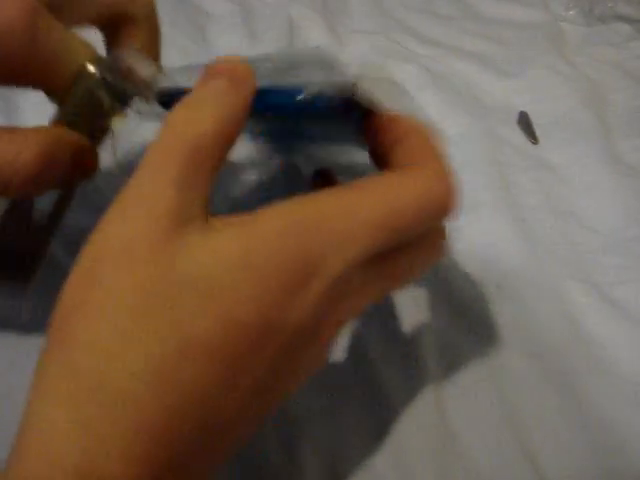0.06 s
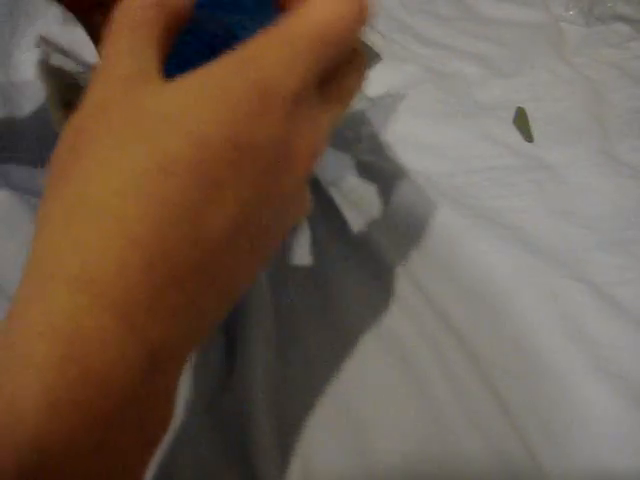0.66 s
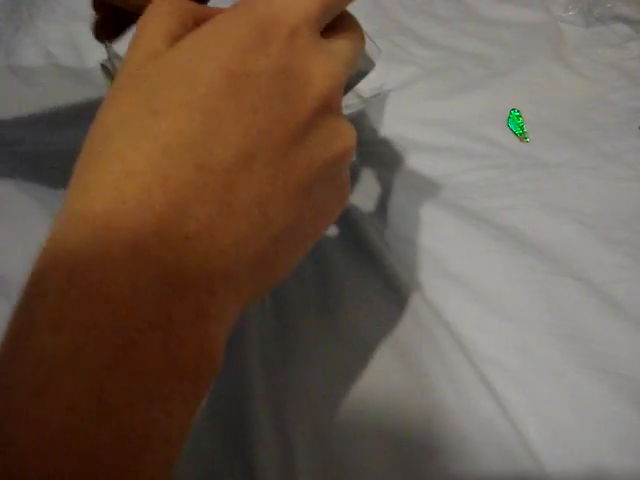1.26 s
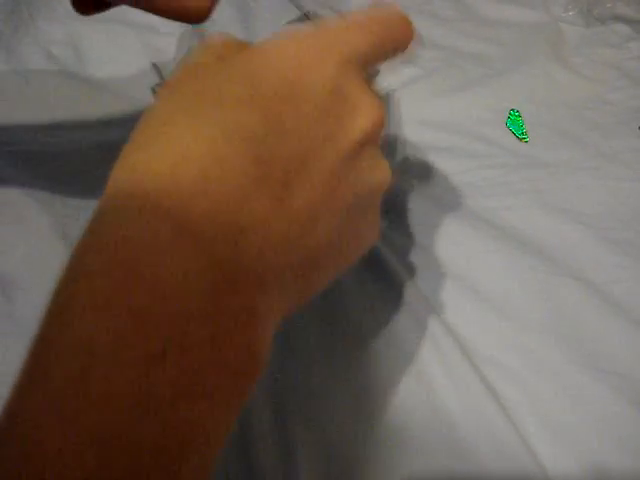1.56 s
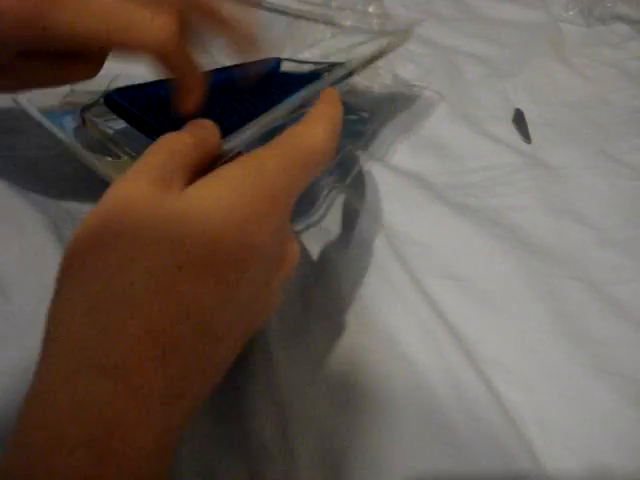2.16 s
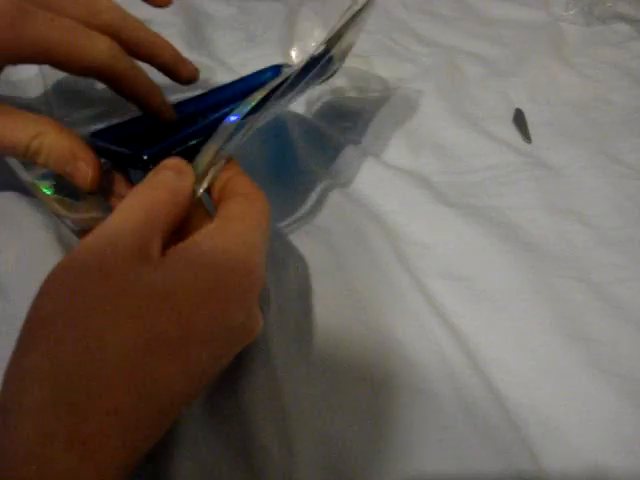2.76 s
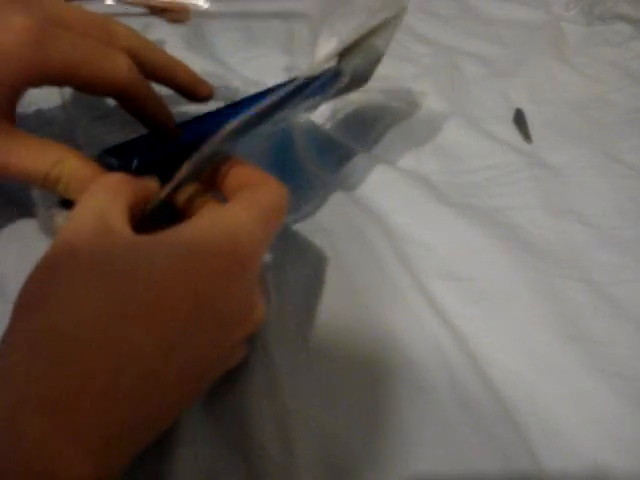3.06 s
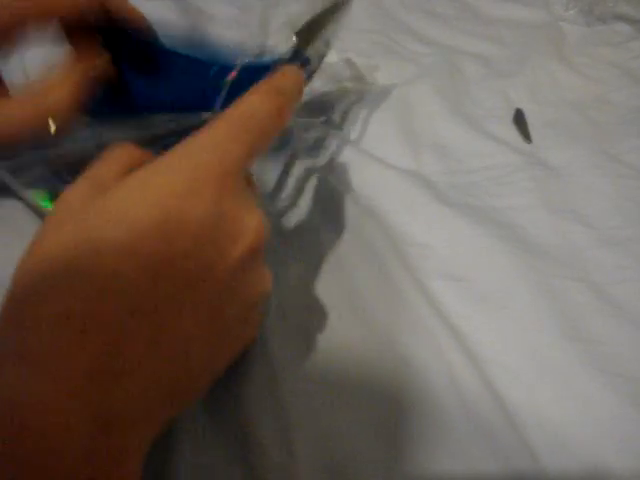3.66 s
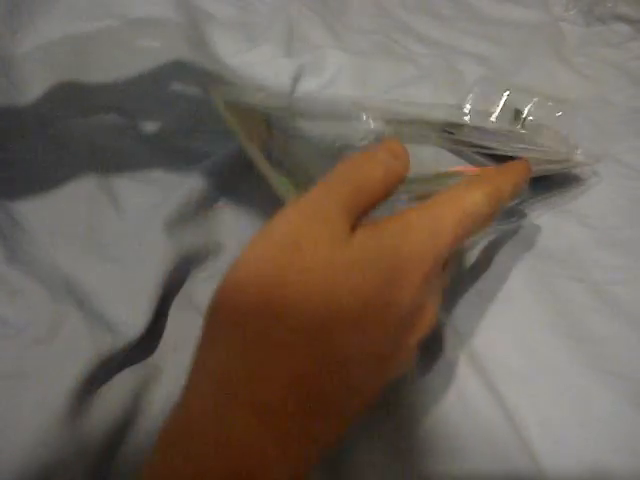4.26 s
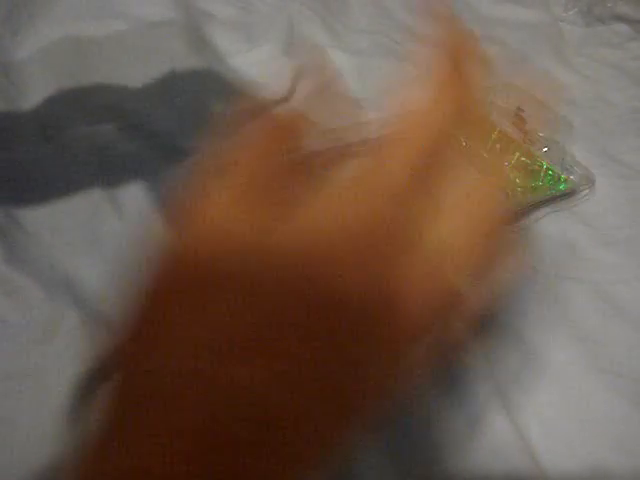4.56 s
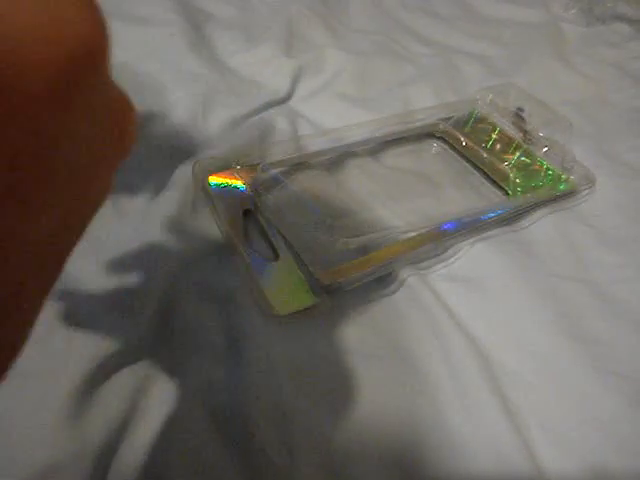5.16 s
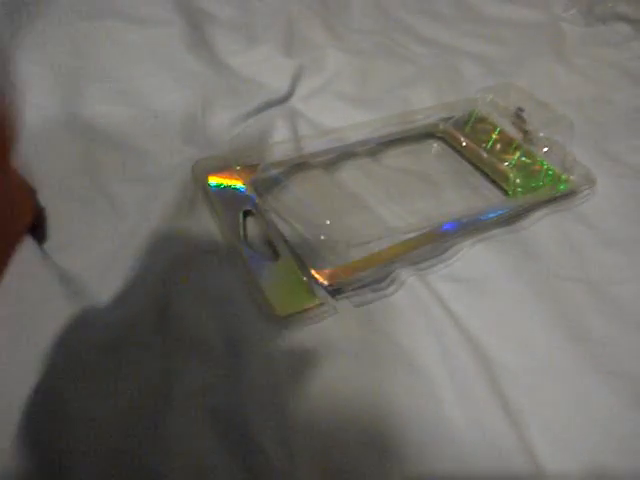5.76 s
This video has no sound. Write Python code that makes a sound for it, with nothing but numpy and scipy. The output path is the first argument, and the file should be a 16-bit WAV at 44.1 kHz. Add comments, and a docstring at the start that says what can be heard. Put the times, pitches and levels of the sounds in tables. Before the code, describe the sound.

Hands open a stiff plastic blister pack on a bed, close to a small microphone in a small room. Faint hiss and a low rustle of bedclothes run throughout. In the first second, fingers scrape the plastic, with light clicks and soft bumps. A sharp snap comes at 1.1 seconds, and the inner tray slides briefly until 1.5. Loud crunches and snaps follow at about 1.5 and 1.75 seconds, each with a short, hollow plastic ring. Smaller clicks and rubbing continue, with a sharper crack near 2.65 seconds and another snap near 3.35. The last big burst of crackling comes from 3.8 to 4 seconds, ending with a dull knock. The hiss dips briefly after the loudest snaps. A few lighter snaps follow until about 4.6 seconds, then the rubbing fades, and one soft bump comes near 5.7 seconds.

```python
"""Two hands open a stiff plastic blister pack on a bed, close to a small camera in a small room.
From the start, bedclothes rustle and fingers rub over a faint hiss. The shell buckles in snaps, each a
run of tiny slips that rings the sheet and its hollow, and the pack bumps softly. Just after 1 s, walls
start to give way in crunches and the inner tray slides out. The camera turns itself down after loud
snaps, so the hiss dips. A last big burst comes near 4 s, then a few lighter snaps and one soft bump."""
import sys
import numpy as np
from scipy import signal
from scipy.io import wavfile
from scipy.ndimage import uniform_filter1d

SR = 44100
rng = np.random.default_rng(int(sys.argv[2]) if len(sys.argv) > 2 else 0)


def put_to_file(sound):
    """Save the sound as 16-bit audio at rate SR, in the file named by the first command-line argument."""
    columns = np.atleast_2d(sound).T  # one column per channel
    safe = np.clip(columns, -1, 1)
    whole_steps = np.round(safe * 32767)
    wavfile.write(sys.argv[1], SR, whole_steps.astype(np.int16))


N = 256835

# tone of the background rumble and hiss: (f/Hz, level/dB)
HISS_TONE = [(15, -7), (25, -10.5), (70, -34.5), (271, -14), (482, -12), (560, -11), (972, -13),
             (1070, -15.5), (2110, -18), (3960, -22), (7780, -25), (10000, -30), (13000, -69.5),
             (22000, -120)]
# how loudly the bedclothes rustle: (t/s, level/dB)
BEDDING_LEVELS = [(0, -64), (1.0, -58.5), (1.601, -61), (2.2, -61.5), (2.95, -71.5), (3.55, -59),
                  (4.4, -65), (4.9, -63), (5.7, -58)]
# notes at which the plastic shell rings: (f/Hz, level/dB, base time to fade by 60 dB/s)
SHELL_NOTES = [(672, 5.5, 0.097), (738, -4.5, 0.37), (811.4, -4, 0.23), (914, 4.5, 0.17), (1023.4, 1, 0.11),
               (1097, -5, 0.17), (1140, -8, 0.34), (1249, 0, 0.16), (1405, -5, 0.19), (1550, -13.5, 0.13),
               (1553, -14, 0.48), (1950, -3.5, 0.16), (2050, -3.5, .2), (2430, 3.5, 0.05), (2700, -8, 0.17),
               (2770, 0, 0.067)]
# the shell's changing shape: (t/s, hollow's f/Hz, ring time factor: low where fingers damp it)
SHELL_SHAPE = [(0, 1370, 1.24), (.47, 1070, 0.61), (1.1, 840, 0.64), (1.5, 1130, 0.75), (1.8, 1157, 0.91),
               (2.2, 960, 0.78), (2.65, 1130, 0.65), (3.9, 830, 0.81), (4.58, 1464, 0.95)]
# how long the room echoes: (f/Hz, time to fade by 60 dB/s)
ROOM_FADE = [(150, 0.13), (500, 0.24), (1000, 0.38), (2000, 0.21), (4500, 0.3), (9000, 0.26)]
# a finger or an edge scrapes the plastic: (strongest at t/s, level/dB, length/s)
STROKES = [(0.11, -43, 0.014), (0.18, -34.5, 0.051), (0.251, -27.5, 0.028), (0.475, -28.5, 0.023),
           (0.734, -36, 0.016), (0.756, -36, 0.031), (0.833, -47, 0.033), (0.971, -43.5, 0.024),
           (2.115, -36.5, 0.099), (2.53, -34, 0.033), (3.114, -31, 0.028), (3.37, -40.5, 0.3)]
# light rubbing while the hands hold the pack: (t/s, level/dB)
HOLDING = [(0, -56), (.6, -55.5), (1.05, -69), (1.3, -45.5), (2.4, -50.5), (2.75, -44), (2.98, -54),
           (3.48, -43.5), (3.8, -51.5), (4.5, -48), (5.4, -61.5)]
# tone of the rubbing: (f/Hz, level/dB)
RUBBING_TONE = [(60, -34), (200, -27), (550, -8.5), (900, -0.5), (1150, 1), (1450, -2), (2100, 1.5),
                (2900, -5), (4500, -5.5), (7000, -12), (10000, -18)]
# the shell buckles: (t/s, level/dB, hollow level/dB, edge level/dB, length/s, flipping patch's f/Hz)
# the hollow and edge levels are relative to the sheet band
SNAPS = [(0.016, -39.5, 1, 2.5, .006, 2150), (0.028, -35.5, 10, -29, 0.0011, 2110),
         (0.191, -36, 13, 6, .003, 1510), (0.248, -27, 7, 2.5, 0.0038, 1440),
         (0.256, -28.5, 4, -4, 0.0059, 1510), (0.3224, -25.5, -1.5, -8, 0.0054, 1500),
         (0.4761, -25.5, 10, 3, .0025, 1425), (0.484, -34, 6, 11, 0.0027, 770),
         (0.729, -40, 22, 9.5, 0.0047, 1370), (1.108, -12.5, 2.5, 7.5, 0.0019, 5100),
         (1.248, -31.5, 5, -14, .0017, 1300), (1.265, -23.5, 3.5, -3, 0.01, 2060),
         (1.476, -19, -2.5, -0.5, .0044, 2220), (1.494, -15.5, -0.5, 5.5, .007, 1474),
         (1.507, -20, 23, 16, .0037, 1470), (1.521, -16, 8, 18, .0057, 1460),
         (1.543, -18, 30.5, 24.5, .0026, 1330), (1.735, -9.5, -7, -6, .008, 2255),
         (1.739, -9, 12, 4, .0032, 1180), (1.746, -10, -3.5, -2.5, .0042, 2300),
         (1.768, -17, -9, -19, .005, 1220), (1.7854, -12, 2, -26, .005, 1350),
         (1.798, -12.5, 12.5, 11, .006, 1264), (1.903, -27.5, -4, -1.5, .0026, 5170),
         (2.004, -38, 8, 16, .0022, 5540), (2.043, -41.5, -11, 17, .0012, 4490),
         (2.107, -26, 4.5, 3, .006, 4640), (2.196, -26, 7, 2.5, 0.0013, 940),
         (2.22, -26.5, 1.5, -2, 0.0031, 2170), (2.2932, -29.5, 1, -11, .0038, 2450),
         (2.304, -33, -2, -12, .0033, 1700), (2.355, -33.5, 5, 2, .005, 4650),
         (2.409, -24.5, -1, -4, 0.0025, 2310), (2.445, -35.5, 6, -3, .0043, 1610),
         (2.559, -24.5, -4.5, -4.5, 0.0017, 1520), (2.608, -30, 3.5, -6.5, .0025, 1300),
         (2.639, -13.5, -2.5, -3.5, .0018, 1400), (2.646, -12, 8, -2, .0014, 1400),
         (2.694, -17, 4.5, 3.5, .004, 4300), (2.8248, -27.5, 0, -1, .0008, 2494),
         (3.241, -36, 7, 13, .001, 5340), (3.261, -36, 8, -26, .0043, 1400),
         (3.286, -35.5, 6, 11, .002, 4670), (3.352, -15.5, -6, -4, 0.0012, 2600),
         (3.585, -33.5, -10, -6.5, .0009, 2550), (3.748, -33.5, -2.5, -5, .0007, 2470),
         (3.774, -39, -8, 0, .005, 2520), (3.8277, -10, 3.5, 1.5, .0035, 910),
         (3.853, -14.5, 5.5, -0.5, 0.0012, 1350), (3.866, -7.5, 5, 4, .0076, 2800),
         (3.876, -14, 6, 8, 0.005, 3660), (3.885, -11.5, 4, 1.5, .0027, 1440),
         (3.889, -7, 7, -9, .006, 1243), (3.909, -13, 4.5, 2, .0032, 1810),
         (3.94, -10, 3.5, 2.5, .007, 1370), (3.946, -9.5, 16, 9, .0057, 1270),
         (3.9625, -12, 22, -11, .009, 910), (4.064, -32, -5, -2, .0017, 3330),
         (4.108, -22, -3, -4, 0.0059, 3350), (4.2534, -26, 10, 12.5, .0024, 760),
         (4.547, -29, 7.5, -1, .0036, 1480), (4.573, -24.5, -1.5, -4, 0.012, 1570),
         (4.58, -34, 23, -16, 0.0035, 1650), (4.936, -43.5, 5.5, -6, .006, 1780)]
# a snap's bands, named thud, hollow, sheet, lower edge and upper edge: (low f/Hz, high f/Hz)
SNAP_BANDS = [(120, 560), (720, 1550), (1600, 3500), (3500, 6300), (6300, 10400)]
# how much each of those bands rings on: (level/dB)
AFTER_RING = [5, 8, 2, -4.5, -14.5]
# tone of the plastic: (f/Hz, level/dB)
PLASTIC_TONE = [(100, -9.5), (300, -3.5), (550, -1.5), (750, -6), (1150, -0.5), (1650, -0.5), (2300, 4),
                (3500, 0.5), (5500, 0.5), (8000, 1), (10000, -6)]
# the pack bumps against hand and bed: (t/s, level/dB)
BUMPS = [(0.248, -34), (0.482, -33.5), (0.974, -44.5), (1.109, -33.5), (1.248, -29.5), (1.266, -21.5),
         (1.28, -29), (2.409, -29.5), (2.855, -46), (3.352, -49), (3.964, -22), (5.663, -41)]
# a wall of the pack gives way: (t/s, length/s, level/dB)
CRUNCHES = [(1.118, 0.01, -23), (1.475, 0.069, -18), (1.736, 0.077, -14.5), (2.644, 0.032, -27),
            (3.83, 0.031, -11.5), (3.937, 0.055, -25.5)]
# the inner tray slides out of its sleeve: (t/s, level/dB)
SLIDE_LEVELS = [(1.2, -46), (1.29, -38.5), (1.4, -39.5), (1.47, -39.5), (1.52, -81)]
# notes of the air gap between tray and sleeve: (f/Hz, width/Hz, level/dB)
GAP_NOTES = [(574, 42, 8), (1720, 340, 0), (2320, 200, -3), (3500, 59, -0.5), (4440, 510, -18)]


def gain_of(db):
    """Turns decibels into a factor to multiply by."""
    return 10 ** (np.asarray(db) / 20)


def unit_power(x):
    """Scales a sound to an average power of one."""
    return x / np.sqrt(np.mean(x ** 2) + 1e-20)


def unit_energy(x):
    """Scales a sound so that its squares add up to one."""
    return x / np.sqrt(np.sum(x ** 2) + 1e-20)


def at_pitch(points, hz):
    """Looks up a frequency in a table, on a log scale."""
    f, value = np.transpose(points)
    return np.interp(np.log(hz + 1), np.log(f + 1), value)


def level_curve(points, **ends):
    """Joins (time, level) points into a gain for every sample."""
    return gain_of(np.interp(np.arange(N) / SR, *np.transpose(points), **ends))


def add(mix, s, sound):
    """Mixes a sound in, starting at s seconds."""
    part = mix[max(round(s * SR), 0):][:len(sound)]
    part += sound[:len(part)]


def coloured(x, tone, size=2048):
    """Filters a sound to follow a tone table."""
    log_gain = np.log(gain_of(at_pitch(tone, abs(np.fft.fftfreq(size, 1 / SR)))))
    taps = np.fft.ifft(np.exp(np.conj(signal.hilbert(log_gain)))).real  # nothing rings before its cause
    return signal.oaconvolve(x, taps)[:len(x)]


def bandpass(x, edges_hz, order=3):
    """Keeps what lies between two frequencies."""
    return signal.sosfilt(signal.butter(order, edges_hz, "band", fs=SR, output="sos"), x)


def slips(count, per_s, spread_db):
    """Surfaces catch and let go: random clicks of uneven size."""
    chance, size, sign = rng.random((3, count))
    strength = gain_of(spread_db * np.minimum(-np.log(1 - size), 4))
    return (chance < per_s / SR) * np.sign(sign - .5) * strength


def background(level_db=-53.5):
    """The room rumbles and the microphone hisses steadily."""
    return gain_of(level_db) * unit_power(coloured(rng.standard_normal(N), HISS_TONE))


def bedding(band_hz=(74.4, 374)):
    """Cloth shifts under the arms with a low rustle."""
    rustle = bandpass(slips(N, per_s=1500, spread_db=7.5), band_hz, order=2)
    return unit_power(rustle) * level_curve(BEDDING_LEVELS)


def shell_ring(t, s, boost_db=8, boost_octaves=0.04):
    """The shell rings: notes near the pitch of its hollow are boosted, and the grip detunes each a bit."""
    hz, db, fade_s = np.transpose(SHELL_NOTES)[:, :, None]
    times, *columns = np.transpose(SHELL_SHAPE)
    hollow_hz, sustain = (np.interp(s, times, column) for column in columns)
    bend, strike = rng.standard_normal((2, len(SHELL_NOTES), 1))
    nearness = np.exp(-(np.log2(hz / hollow_hz) / boost_octaves) ** 2 / 2)
    strength = gain_of(db + 1.5 * strike + boost_db * nearness)
    phase = 2 * np.pi * rng.random(hz.shape)
    swing = np.sin(2 * np.pi * hz * (1 + 0.0089 * bend) * t + phase)
    fade = np.exp(-np.log(1000) * t / (fade_s * sustain))
    return unit_energy(np.sum(strength * fade * swing, axis=0))


def room_echo(t, gap_s=0.001, rise_s=0.0068):
    """Many echoes arrive after a short gap; each pitch fades at its own speed."""
    hz, times, spectrum = signal.stft(rng.standard_normal(len(t)), SR, nperseg=256)
    fade = np.exp(-np.log(1000) * times / at_pitch(ROOM_FADE, hz)[:, None])
    echo = signal.istft(spectrum * fade, SR, nperseg=256)[1][:len(t)]
    return unit_energy(echo * np.clip((t - gap_s) / rise_s, 0, 1))


def stroke_curve(swell_share=0.29):
    """The gain of the scraping strokes: each swells quickly and lets go more slowly."""
    t = np.arange(N) / SR
    power = np.zeros(N)
    for s, level_db, length_s in STROKES:
        away = np.maximum((s - t) / swell_share, t - s) / length_s
        power += (gain_of(level_db) * np.exp(-np.minimum(away, 20))) ** 2
    return np.sqrt(power)


def rubbing(level_db=-1, ring_db=-8, ticks_db=-9, rasp_db=-3, rasp_hz=(850, 2400)):
    """Fingers stick and slip: fine grains and bright ticks ring the shell; firm strokes add a rasp."""
    t = np.arange(SR // 3) / SR
    grains = unit_power(coloured(slips(N, per_s=2000, spread_db=7), RUBBING_TONE))
    tick = rng.standard_normal(len(t)) * np.exp(-t / 0.0012)
    ticks = signal.oaconvolve(slips(N, per_s=45, spread_db=2.1), tick)[:N]
    friction = grains + gain_of(ticks_db) * unit_power(bandpass(ticks, [900, 9000], order=1))
    response = gain_of(ring_db) * shell_ring(t, 0) + room_echo(t)
    rub = unit_power(friction + .5 * signal.oaconvolve(friction, response)[:N])
    rasp = unit_power(bandpass(slips(N, per_s=4000, spread_db=3.5), rasp_hz, order=2))
    strokes = stroke_curve()
    effort = np.hypot(0.74 * strokes, level_curve(HOLDING))
    return gain_of(level_db) * (effort * rub + gain_of(rasp_db) * strokes * rasp)


def flip(t, length_s, crack_db=-7, creep_db=-5, creep_s=0.0008, lead=600):
    """A crease creeps, gives one sharp crack, then settles in a run of smaller slips."""
    fade = np.exp(-t / max(1.63 * length_s, .0003))
    run = unit_energy(slips(len(t), per_s=2500, spread_db=2.76) * fade)
    run[0] += gain_of(crack_db)
    creep = slips(lead, per_s=9000, spread_db=2.1) * np.exp(-t[:lead] / creep_s)
    build_up = gain_of(creep_db) * unit_energy(creep)[::-1]
    return np.concatenate([build_up, unit_energy(run)])


def near_echoes(x, level_db=-6, count=3):
    """Folds and fingers close by throw back copies within 2 ms, so each snap has its own tone."""
    delays = rng.integers(8, 90, count)  # samples
    signs = rng.choice([-1, 1], count)
    copies = sum(sign * np.pad(x, (delay, 0))[:len(x)] for delay, sign in zip(delays, signs))
    return x + gain_of(level_db) * copies


def snap(s, level_db, hollow_db, edge_db, length_s, patch_hz, ring_db=-2, patch_db=4, size=16384):
    """The sheet buckles once; the small patch that flips colours it, and shell and room ring on."""
    thud_db = -10.5 + 0.63 * hollow_db  # the low push grows with the hollow
    tail_db = -6.5 + 0.28 * (level_db + 25)  # hard snaps shake the whole shell and ring on more
    t = np.arange(size) / SR
    crack = flip(t, length_s)
    lead = len(crack) - size  # samples of creep before the crack
    tail = np.pad(room_echo(t) + gain_of(ring_db) * shell_ring(t, s), (lead, 0))
    strengths = unit_energy(gain_of([thud_db, hollow_db, 0, edge_db + 0.5, edge_db - 2.5]))
    patch_band = patch_hz * np.array([.935, 1.07])
    sound = np.zeros(len(crack))
    for band, strength, after_db in zip(SNAP_BANDS, strengths, AFTER_RING):
        band_crack = crack + flip(t, length_s)  # each band adds slips of its own, so the bands flicker apart
        drive = np.array([near_echoes(band_crack), tail])
        patch = gain_of(patch_db) * bandpass(drive, patch_band, order=1)
        direct, late = bandpass(drive + patch, band)
        sound += strength * (unit_energy(direct) + gain_of(tail_db + after_db) * unit_energy(late))
    return s - lead / SR, gain_of(level_db) * np.sqrt(0.01 * SR) * sound  # level counted over 10 ms


def bump(s, level_db, band_hz=(133, 605), rise_s=0.0019, fade_s=0.0054, room_db=-4, size=16384):
    """The pack knocks dully against hand or bed, and the room answers."""
    t = np.arange(size) / SR
    push = rng.standard_normal(size) * np.minimum(t / rise_s, 1) * np.exp(-t / fade_s)
    direct, late = bandpass(np.array([push, room_echo(t)]), band_hz)
    knock = unit_energy(direct) + gain_of(room_db) * unit_energy(late)
    return s, gain_of(level_db) * np.sqrt(0.01 * SR) * knock


def crunch(s, length_s, level_db, crack_s=0.00073, fade_s=0.018, room_db=-1, size=16384):
    """A wall folds in a hail of small cracks that then die away; shell and room ring on."""
    t = np.arange(size) / SR
    cracks = slips(size, per_s=450, spread_db=4.5) * np.exp(-np.maximum(t - length_s, 0) / fade_s)
    # each crack becomes its own tiny burst of noise
    power = signal.lfilter([1], [1, -np.exp(-2 / (crack_s * SR))], cracks ** 2)
    bursts = np.sqrt(power) * rng.standard_normal(size)
    direct = unit_energy(bandpass(bursts, (600, 9000), order=1))
    ring = unit_energy(signal.oaconvolve(direct, shell_ring(t, s, boost_db=14))[:size])
    room = unit_energy(signal.oaconvolve(direct, room_echo(t))[:size])
    sound = unit_energy(direct + ring + gain_of(room_db) * room)
    return s, gain_of(level_db) * np.sqrt(length_s * SR) * sound


def tray_slide():
    """The tray rubs along its sleeve and rings the air gap between them."""
    grains = slips(N, per_s=8000, spread_db=2.4)
    sound = sum(gain_of(db) * bandpass(grains, [hz - width / 2, hz + width / 2], order=1)
                for hz, width, db in GAP_NOTES)
    return unit_power(sound) * level_curve(SLIDE_LEVELS, left=-np.inf, right=-np.inf)


def scene():
    """Snaps, crunches and bumps take on the plastic's tone and join the softer sounds."""
    crackle = np.zeros(N)
    for source, rows in ((snap, SNAPS), (crunch, CRUNCHES), (bump, BUMPS)):
        for row in rows:
            add(crackle, *source(*row))
    return (coloured(crackle, PLASTIC_TONE) + rubbing() + tray_slide() + bedding() + background())[None]


def record(dry, threshold_db=-22, duck_share=0.49, held_fall_db_per_s=12, treble_limit=0.27, top_hz=10150):
    """The camera turns down fast when it gets loud and recovers slowly; sharp peaks flatten and thump."""
    x = dry[0]
    power_db = 10 * np.log10(abs(uniform_filter1d(x ** 2, size=220)) + 1e-12)
    fall_db = np.arange(N) * held_fall_db_per_s / SR
    held_db = np.maximum.accumulate(power_db + fall_db) - fall_db  # jumps to each peak, then sinks
    over_db = np.maximum(held_db - threshold_db, 0)
    x = x / gain_of(duck_share * uniform_filter1d(over_db, size=90))
    body = uniform_filter1d(x, size=9)
    treble = x - body
    overload = np.maximum(abs(bandpass(x, [4000, 10000])) - 0.036, 0)
    thump = gain_of(-5) * bandpass(overload, [12, 65], order=1)  # one-sided overload leaves a low push
    x = body + treble_limit * np.tanh(treble / treble_limit) + thump
    x = .7 * x / (.7 ** 4 + x ** 4) ** .25  # the camera rounds off the biggest peaks
    lowpass = signal.firwin(401, top_hz, window=("kaiser", 8), fs=SR)
    return signal.oaconvolve(x, lowpass, "same")[None]


dry = scene()
out = record(dry)
put_to_file(out)
```